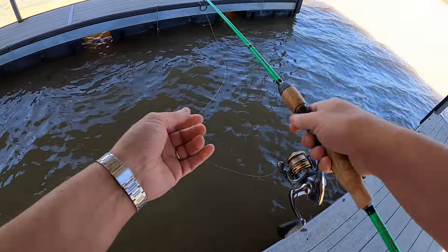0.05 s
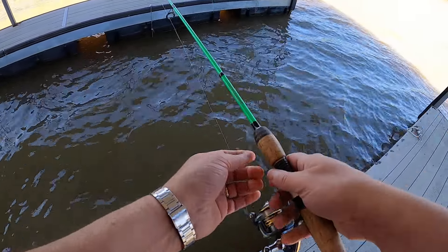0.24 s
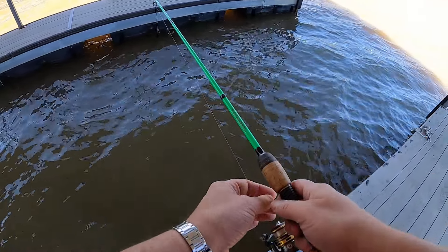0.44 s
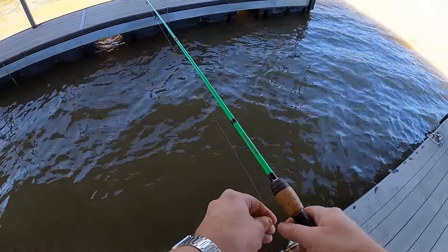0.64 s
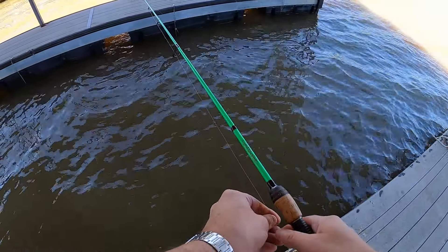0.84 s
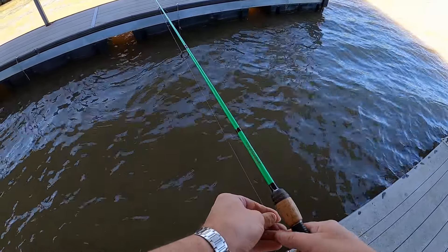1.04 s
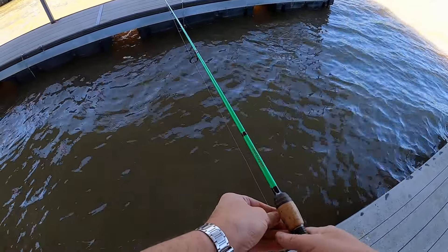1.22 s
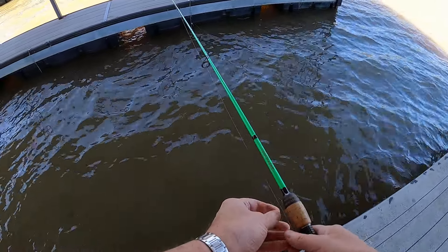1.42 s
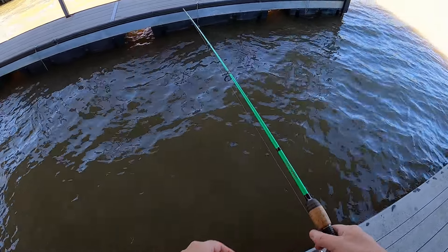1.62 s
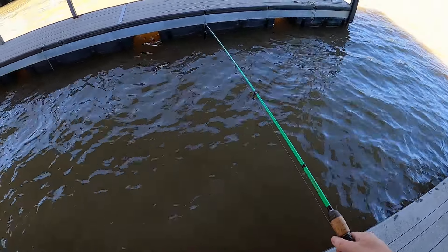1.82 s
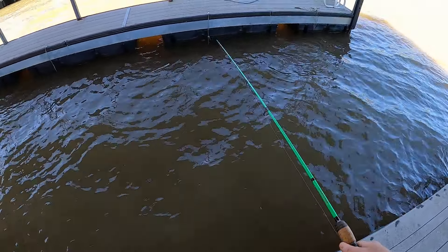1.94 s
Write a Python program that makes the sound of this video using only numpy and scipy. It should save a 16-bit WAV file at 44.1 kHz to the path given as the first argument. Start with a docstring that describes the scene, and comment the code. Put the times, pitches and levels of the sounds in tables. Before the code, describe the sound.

Small waves lap and gurgle around a dock over a light wind rumble. A handled fishing rod gives four sharp clicks and soft bumps, and clothing rubs briefly near the end. A body-worn microphone makes everything sound boxy.

```python
"""Small waves lap around a dock while light wind and body movement rumble underneath.
It is all heard through the closed plastic case of a body-worn camera, which adds a boxy ring.
Handling a fishing rod sends four sharp clicks and some soft bumps into the case, with brief scratches
from hands and line. Three little waves slap under the dock and trap air that rings. Later something,
probably clothing, rubs on the case as the arm reaches out."""
import sys
import numpy as np
from scipy import signal
from scipy.fft import rfft, irfft
from scipy.io import wavfile
from scipy.ndimage import uniform_filter1d

SR = 44100
rng = np.random.default_rng(int(sys.argv[2]) if len(sys.argv) > 2 else 0)


def dump_mix(stems):
    """Bounce the given channels to the path in sys.argv[1] as a 16-bit WAV at rate SR."""
    frames = np.atleast_2d(stems).T  # one column per channel
    limited = np.clip(frames, -1, 1)  # hard clip at full scale
    pcm = np.round(limited * 32767).astype(np.int16)
    wavfile.write(sys.argv[1], SR, pcm)


N = 121275  # 2.75 seconds
TIME_S = np.arange(N) / SR
SIDES = np.array([[1], [-1]])  # left, right

# The case's two microphone holes: pitch_hz, left_over_right_db, left_lag_rad, likeness_0_to_1
MIC_HOLES = [(56.4, 4.5, -0.71, 0.82), (161, -0.5, 0.36, 0.99), (365, 0, 0.75, 0.95),
             (590, -2.5, -0.2, 0.6), (704, -13.5, 0.63, 0.5), (1340, 3, 0.88, 1), (1480, 3, 0.17, 0.99),
             (2007, 2, 2.22, 1), (2580, 3, 1.86, 0.98), (2970, 4, 0.2, 0.98), (5000, -2.5, 2.2, 0.5),
             (8140, -0.5, 1.4, 0.18)]
# The notes the case rings at: pitch_hz, fade_60db_s, level_db, left_over_right_db, left_lag_rad
CASE_NOTES = [(128.4, 0.064, -18.5, 0, -0.31), (346, 0.019, -17.5, 2.5, -0.64),
              (571, 0.038, -25.5, -4, 0.067), (670, .018, -12.5, -1.5, 0.22), (995, 0.0083, -1.5, 9, 0.73),
              (1232, .026, -29, -1.5, -.2), (1324, 0.031, -9.5, 2, -0.089), (1428, 0.0084, 6, -6, -0.0031),
              (1518, 0.016, -2, 1.5, 1), (1811, 0.013, -7, 3.5, -0.52), (1980, 0.02, -16.5, 1.5, -0.82),
              (2152, 0.0074, -14.5, 11, -0.77), (2530, 0.0047, -14.5, -6.5, 0.29),
              (2958, 0.02, -26.5, 5.5, 0.62), (3102, 0.018, -21.5, 3, 0.47), (3950, 0.013, -39, 8, 0.44),
              (4180, 0.018, -41.5, 8, -.1), (5300, .011, -51, -6, 0)]

# How loud each ongoing sound is over time: time_s, level_db
WASH_LEVELS = [(0, -54), (.18, -57), (.36, -52.5), (.48, -49.5), (.56, -54.5), (.63, -48.5), (.70, -56),
               (.79, -53), (1.02, -49), (1.15, -54), (1.22, -54.5), (1.44, -47), (1.52, -55.5),
               (1.62, -53.5), (1.72, -59), (2.32, -53), (2.35, -60.5), (2.56, -63.5), (2.69, -49),
               (2.75, -50.5)]
SLOSH_LEVELS = [(0, -79.5), (.4, -73), (.6, -60.5), (.78, -63.5), (.98, -61), (1.2, -62), (1.42, -57),
                (1.53, -63), (1.63, -63), (1.77, -64), (2.0, -59.5), (2.35, -67.5), (2.75, -67.5)]
RUMBLE_LEVELS = [(0, -58.5), (.12, -48.5), (.3, -50), (.48, -48.5), (.58, -52.5), (.85, -51), (1.08, -56),
                 (1.25, -48.5), (1.42, -55.5), (1.52, -62.5), (1.72, -68), (1.88, -78), (2.04, -45.5),
                 (2.18, -52.5), (2.3, -80), (2.46, -44), (2.54, -49.5), (2.6, -65), (2.75, -60)]
BOOM_LEVELS = [(0, -60), (.12, -49.5), (.28, -55.5), (.45, -59), (.7, -59), (.9, -55), (1.1, -58.5),
               (1.28, -52), (1.42, -55.5), (1.52, -70.5), (1.8, -70), (1.92, -57), (2.3, -58.5),
               (2.4, -53.5), (2.53, -52.5), (2.6, -58.5), (2.75, -56.5)]
RUB_LEVELS = [(1.55, -71), (1.8, -54), (1.87, -49.5), (1.925, -41.5), (1.96, -44), (2.005, -48),
              (2.055, -42), (2.085, -41.5), (2.13, -40.5), (2.18, -48), (2.215, -48.5), (2.25, -52),
              (2.34, -61)]

# The tone of each noise through the case, from bass to treble: pitch_hz, relative_level_db
WASH_TONE = [(25, -37.5), (110, -27.5), (300, -27), (480, -15.5), (700, -14.5), (950, -11.5), (1120, -7.5),
             (1320, 0.5), (1540, -1), (1800, -10), (1980, -5.5), (2250, -13.5), (2650, -13.5), (3100, -6),
             (3550, -20.5), (4300, -24), (5000, -30), (6000, -35), (6500, -39.5), (7500, -36.5),
             (8300, -55.5), (12000, -69.5)]
SLOSH_TONE = [(100, -31.5), (170, -6.5), (300, 2.5), (450, 5), (700, -5), (1050, 0.5), (1400, 7),
              (2000, -10), (2600, -11), (3100, -22.5), (4500, -35.5), (8300, -62)]
RUMBLE_TONE = [(15, 2.5), (30, 2.5), (50, -0.5), (75, 0), (105, 1.5), (150, -4), (250, -32), (450, -36),
               (900, -80)]
BOOM_TONE = [(40, -12.5), (100, -12.5), (140, 2.5), (200, -1), (270, -18), (450, -29.5), (900, -60.5)]
DISTANT_HISS_TONE = [(200, -9.5), (1400, 0.5), (3000, -13.5), (4500, 1), (6000, 0.5), (6500, -12.5),
                     (7500, -7), (8300, -38)]
BRIGHT_EDGE_TONE = [(1500, -25), (3000, 6.5), (4200, 11), (6000, 1.5), (7700, -4.5), (8400, -24.5),
                    (13000, -29)]
CRACK_TONE = [(600, -23), (1400, -4), (3000, -8.5), (4200, -7.5), (5200, -8.5), (7500, -11), (8400, -37)]
SPLASH_TONE = [(150, -6.5), (420, 8.5), (700, -1.5), (1000, 9.5), (1600, -4), (3000, -28), (8000, -57)]
RUB_TONE = [(100, -16), (150, -0.5), (210, 0.5), (290, -13.5), (390, -18.5), (490, -5), (670, -4.5),
            (800, -7.5), (1050, -2), (1330, 3.5), (1520, -2), (1700, -9), (2000, -0.5), (2250, -12),
            (2700, -10.5), (3050, -5.5), (3550, -19.5), (4800, -25.5), (6000, -29), (6500, -38),
            (7500, -33.5), (8300, -59.5), (12000, -67)]

# Dull thuds of body movement: start_s, level_db, pitch_hz
BODY_THUDS = [(0.076, -44, 170), (0.23, -34.5, 105.6), (0.263, -45, 59.7), (0.321, -46, 52),
              (0.383, -43, 74.4), (0.491, -41, 102.6), (0.623, -41, 71.7), (0.927, -43, 85),
              (1.212, -37, 80.6), (1.354, -41.5, 132), (1.547, -45, 80), (2.537, -46.5, 102)]
# Scratches of hands and fishing line: start_s, length_s, level_db, bright_edge_db
HAND_SCRATCHES = [(0.082, 0.05, -72, -68.5), (0.246, 0.046, -55, -79), (0.7, 0.14, -52, -77),
                  (1.18, 0.051, -50.5, -71.5), (1.353, 0.036, -58.5, -66), (1.385, 0.0077, -46.5, -58)]
# Sharp clicks of the rod: start_s, level_db, thump_db, body_db, tilt_db_per_octave, treble_db, crack_db
ROD_CLICKS = [(0.2163, -8.7, 2, -2, -3, 7.5, -19), (1.28, -18, 7, -1, -6, -2, -26),
              (1.5503, -18, 2, 2, 6, 6, -15), (2.4751, -12.5, 8, -7, -3, 7, -19)]
# Soft bumps on the case: start_s, level_db, thump_db, treble_db
CASE_BUMPS = [(0.26, -38, -7, -1), (0.4786, -34, -9, -6), (1.101, -43, -9, 17), (1.3387, -37.5, 20.5, 3),
              (1.4582, -40, -10, 3), (1.5999, -37.5, 1, 13), (1.8447, -38, -13, 12), (2.204, -32.5, -8, 12),
              (2.2134, -32.5, 22.5, 2), (2.587, -47.5, -8, -5), (2.6633, -40, -7, 6)]
# Little waves slapping under the dock: start_s, level_db, pitch_hz
WAVE_SLAPS = [(.5755, -44, 465), (.811, -53.5, 517), (1.0627, -42.5, 445)]
# Moments when the cloth catches and lets go: start_s, boost_db
CLOTH_CATCHES = [(1.891, 2), (2.023, 8), (2.076, 1), (2.123, 1)]
# The camera's faint steady whine: pitch_hz, level_db
CAMERA_WHINE = [(5970, -90)]

SLIPS_PER_S, SLIP_SPREAD_DB = 900, 2.5  # the tiny jerks in a rub or scratch
CLICK_RISE_S, THUMP_RISE_S, CRACK_FADE_S = 0.0011, 0.0033, 0.0005


def gain(db):
    """Turn decibels into a number to multiply a sound by."""
    return 10 ** (np.asarray(db) / 20)


def normalize(sound):
    """Scale a sound so its average strength (rms) is 1."""
    return sound / np.sqrt(np.mean(sound ** 2))


def noise():
    """Plain, even hiss."""
    return rng.standard_normal(N)


def fade(t, fade_s):
    """Die away by 60 dB every fade_s seconds."""
    return np.exp(-np.log(1000) * t / fade_s)


def loudness(levels):
    """Glide between (time_s, level_db) points, with silence outside them."""
    times_s, db = np.array(levels).T
    return gain(np.interp(TIME_S, np.r_[times_s[0] - .1, times_s, times_s[-1] + .1], np.r_[-120, db, -120]))


def flicker(per_s, depth_db):
    """A smooth random wobble in loudness."""
    hold = int(SR / per_s)
    steps = np.repeat(rng.standard_normal(N // hold + 1), hold)
    smooth = uniform_filter1d(uniform_filter1d(steps, hold), hold)[:N]
    return gain(depth_db * 1.3 * smooth)  # 1.3 makes up for the smoothing


def grains(per_s, spread_db):
    """Tiny pops at random times, of uneven strength."""
    pops = (rng.random(N) < per_s / SR) * rng.choice([-1, 1], N)
    return normalize(pops * gain(spread_db * np.minimum(rng.exponential(size=N), 4)))


def add(out, start_s, sound):
    """Mix a short stereo sound in at start_s."""
    i = int(start_s * SR)
    out[:, i:i + sound.shape[1]] += sound[:, :N - i]


def across_pitches(table):
    """Spread each column of a pitch table over every frequency in the sound."""
    log_hz = np.log(np.maximum(np.arange(N // 2 + 1) * SR / N, 1))
    pitches_hz, *columns = np.array(table).T
    return [np.interp(log_hz, np.log(pitches_hz), column) for column in columns]


def through_case(sound, tone):
    """The case shapes a sound's tone and passes it to two microphone holes; the result has strength 1."""
    tone_db, = across_pitches(tone)
    # Build a filter that rings only after each sound, never before it.
    cepstrum = irfft(np.log(gain(tone_db)), N)
    ringing = np.exp(rfft(2 * cepstrum * (np.arange(N) < N // 2)))
    pan_db, lag, likeness = across_pitches(MIC_HOLES)
    shared = np.sqrt(1 + likeness) * rfft(normalize(sound))
    unshared = SIDES * np.sqrt(1 - likeness) * rfft(noise())
    placement = gain(SIDES * pan_db / 2) * np.exp(-.5j * SIDES * lag)
    return normalize(irfft((shared + unshared) * ringing * placement, N))


def lapping():
    """Water washes with tiny splashes and fine ticks, over lower gurgling between the dock's floats."""
    drops = noise() + gain(-2.5) * grains(per_s=460, spread_db=-1)
    gurgles = noise() + gain(0.5) * grains(per_s=480, spread_db=2.5)
    wash = through_case(drops * flicker(per_s=34.48, depth_db=2), WASH_TONE)
    ticks = gain(-25.5) * through_case(grains(per_s=140, spread_db=4.5), BRIGHT_EDGE_TONE)
    slosh = through_case(gurgles, SLOSH_TONE)
    return (wash + ticks) * loudness(WASH_LEVELS) + slosh * loudness(SLOSH_LEVELS)


def rumble():
    """Wind and movement push unevenly on the case and make it boom."""
    buffeting = through_case(noise() * flicker(per_s=24.97, depth_db=2.5), RUMBLE_TONE)
    boom = through_case(noise(), BOOM_TONE)
    return buffeting * loudness(RUMBLE_LEVELS) + boom * loudness(BOOM_LEVELS)


def distant_hiss():
    """A faint, steady hiss from far away."""
    return gain(-77) * through_case(noise(), DISTANT_HISS_TONE)


def body_thuds(rise_s=0.011):
    """Body movement gives soft, low pushes that swell and die within a few vibrations."""
    out, t = np.zeros((2, N)), np.arange(SR // 6) / SR
    swell = (t / rise_s * np.exp(1 - t / rise_s)) ** 2
    for start_s, db, hz in BODY_THUDS:
        add(out, start_s, gain(db + SIDES / 2) * swell * np.sin(2 * np.pi * hz * t))
    return out


def scratches():
    """Hands and line slide in short, grainy swishes, some with a bright edge."""
    out = np.zeros((2, N))
    scrape = through_case(grains(SLIPS_PER_S, SLIP_SPREAD_DB), RUB_TONE)
    edge = through_case(grains(SLIPS_PER_S, SLIP_SPREAD_DB), BRIGHT_EDGE_TONE)
    for start_s, length_s, db, edge_db in HAND_SCRATCHES:
        stroke = np.sin(np.pi * np.clip((TIME_S - start_s) / length_s, 0, 1))
        out += stroke * (gain(db) * scrape + gain(edge_db) * edge)
    return out


def case_ring(thump_db, treble_db, body_db=0, tilt_db_per_octave=0):
    """One knock makes the case ring, short and hollow, over a low thump that builds more slowly."""
    out, t = 0, np.arange(SR // 8) / SR
    for hz, fade_s, db, pan_db, lag in CASE_NOTES:
        rise_s = CLICK_RISE_S
        if hz < 400:
            db += thump_db
            rise_s = THUMP_RISE_S
        elif hz < 1100:
            db += body_db
        elif hz < 1890:  # the main ring
            db += tilt_db_per_octave * np.log2(hz / 1400)
        else:
            db += treble_db
        rise = 1 - np.exp(-(t / rise_s) ** 2)
        note = np.sin(2 * np.pi * hz * t - SIDES * lag / 2)
        out += gain(db + SIDES * pan_db / 2) * rise * fade(t, fade_s) * note
    return out


def rod_clicks():
    """Each click of the rod is a very short crack that sets the case ringing."""
    out = np.zeros((2, N))
    crack = through_case(noise(), CRACK_TONE)
    for start_s, db, thump_db, body_db, tilt, treble_db, crack_db in ROD_CLICKS:
        since_s = np.maximum(TIME_S - start_s, 0)
        rise = 1 - np.exp(-(since_s / CLICK_RISE_S) ** 2)
        out += gain(db + crack_db) * crack * rise * np.exp(-since_s / CRACK_FADE_S)
        add(out, start_s, gain(db) * case_ring(thump_db, treble_db, body_db, tilt))
    return out


def soft_bumps():
    """Gentle knocks from handling the rod ring the case without a crack."""
    out = np.zeros((2, N))
    for start_s, db, thump_db, treble_db in CASE_BUMPS:
        add(out, start_s, gain(db) * case_ring(thump_db, treble_db))
    return out


def wave_slaps(rise_s=0.001, glide_per_s=4, upper_pitch_ratio=1.9):
    """Each little wave makes a dull splash and traps two air pockets that ring and rise in pitch."""
    out, t = np.zeros((2, N)), np.arange(SR // 8) / SR
    splash_noise = through_case(noise(), SPLASH_TONE)
    rise = 1 - np.exp(-t / rise_s)
    for k, (start_s, db, hz) in enumerate(WAVE_SLAPS):
        phase = 2 * np.pi * hz * (t + glide_per_s * t ** 2 / 2)
        pockets = (np.sin(phase) + gain(-1) * np.sin(upper_pitch_ratio * phase)) * fade(t, 0.026)
        pockets = gain(-1.5 * SIDES) * pockets  # a little to the right
        splash = gain(2) * splash_noise[:, k * len(t):(k + 1) * len(t)] * fade(t, 0.052)
        add(out, start_s, gain(db) * rise * (pockets + splash))
    return out


def cloth_rubbing(rise_s=0.0017, fall_s=0.0093):
    """Cloth sticks and slips over the case, and surges each time it catches and lets go."""
    slips = noise() + gain(-1) * grains(SLIPS_PER_S, SLIP_SPREAD_DB)
    surge_db = np.zeros(N)
    for start_s, boost_db in CLOTH_CATCHES:
        from_peak_s = TIME_S - start_s - rise_s
        width_s = np.where(from_peak_s < 0, rise_s, fall_s)
        surge_db += boost_db * np.exp(-(from_peak_s / width_s) ** 2)
    rub = through_case(slips, RUB_TONE) * loudness(RUB_LEVELS)
    return rub * gain(surge_db) * flicker(per_s=60, depth_db=2.5)


def scene():
    """Mix the water, the handling and the rumble over a distant hiss."""
    surroundings = distant_hiss() + lapping() + wave_slaps()
    handling = rod_clicks() + soft_bumps() + cloth_rubbing() + scratches()
    return surroundings + handling + rumble() + body_thuds()


def record(dry):
    """The camera adds its own faint whine and hiss, and cuts off the highest treble."""
    whine = sum(gain(db) * np.sin(2 * np.pi * hz * TIME_S) for hz, db in CAMERA_WHINE)
    hiss = gain(-103) * rng.standard_normal((2, N))
    treble_cut = signal.ellip(8, .2, 70, 13400, fs=SR, output="sos")  # steep above 13400 Hz
    return signal.sosfilt(treble_cut, dry + whine + hiss)


dry = scene()
out = record(dry)
dump_mix(out)
```